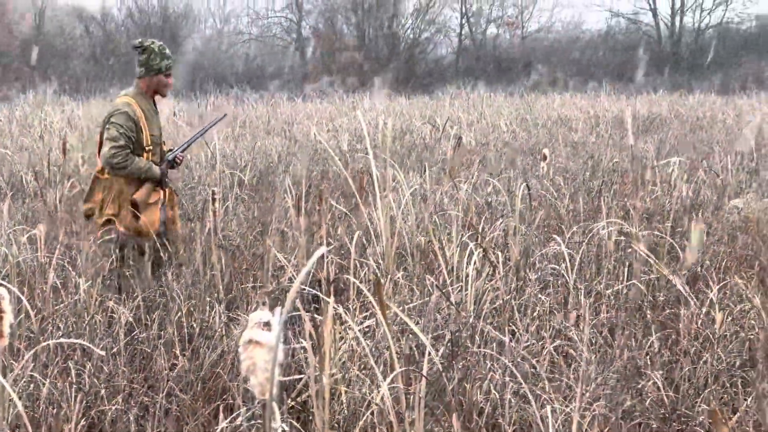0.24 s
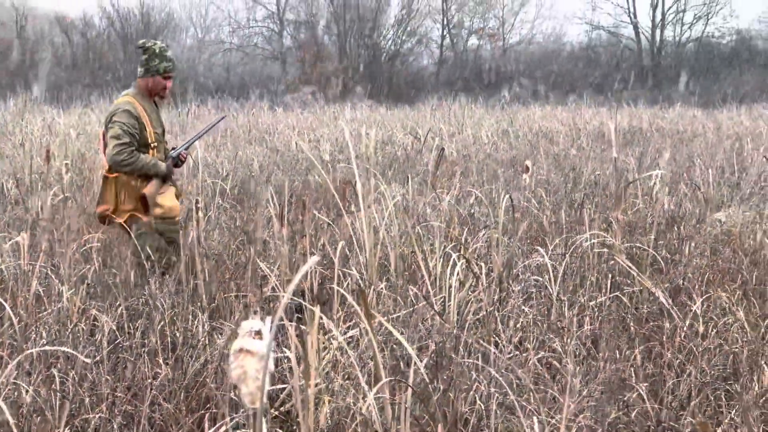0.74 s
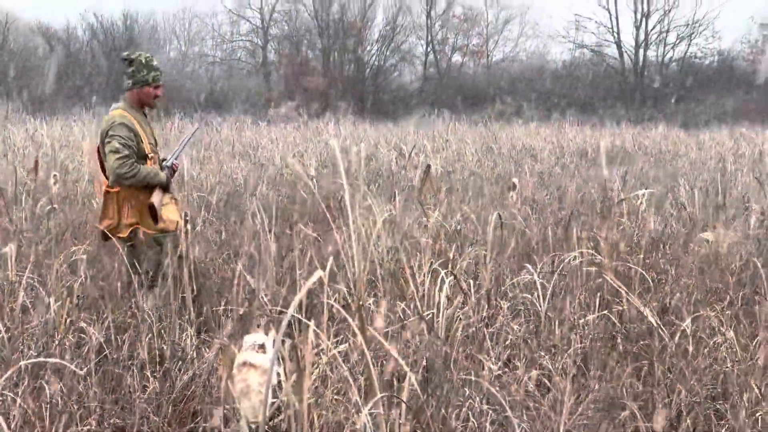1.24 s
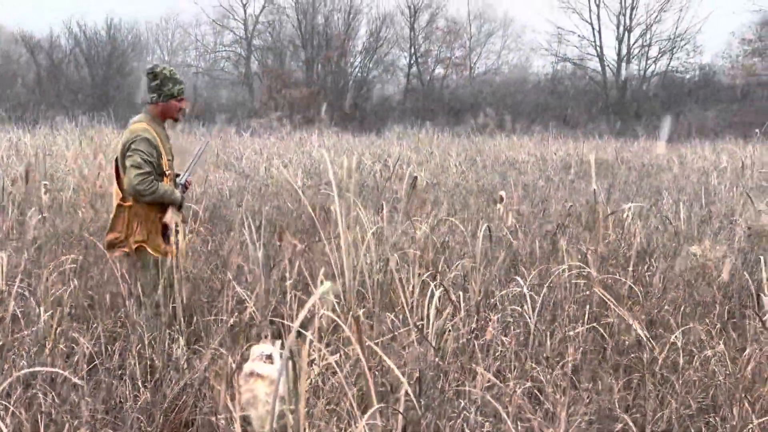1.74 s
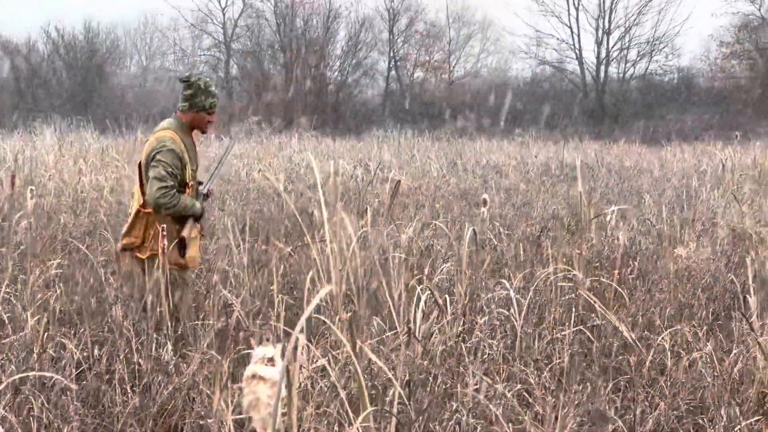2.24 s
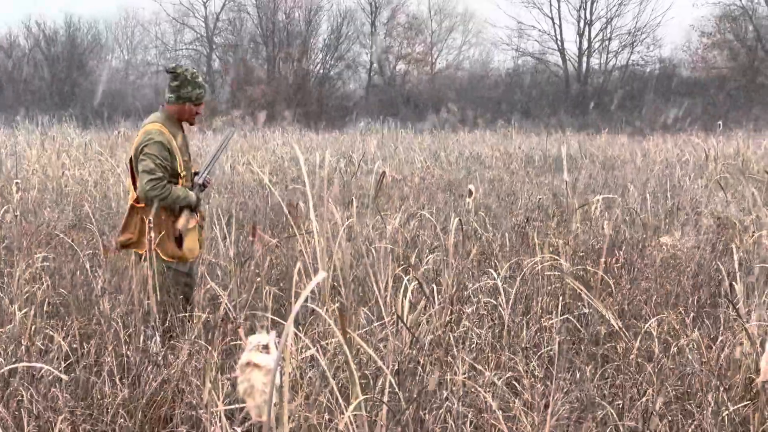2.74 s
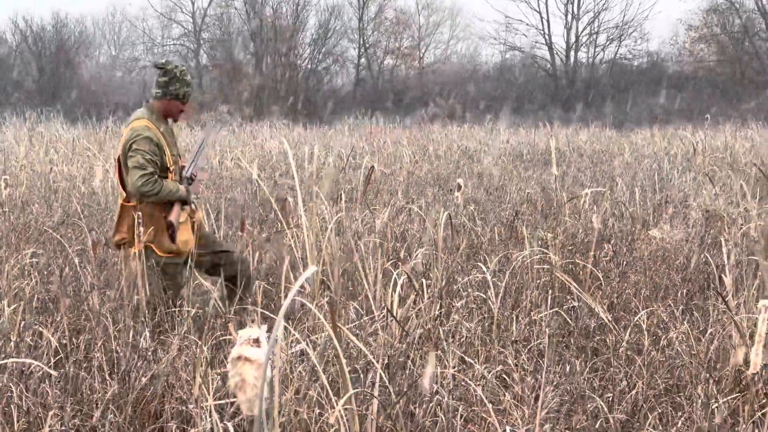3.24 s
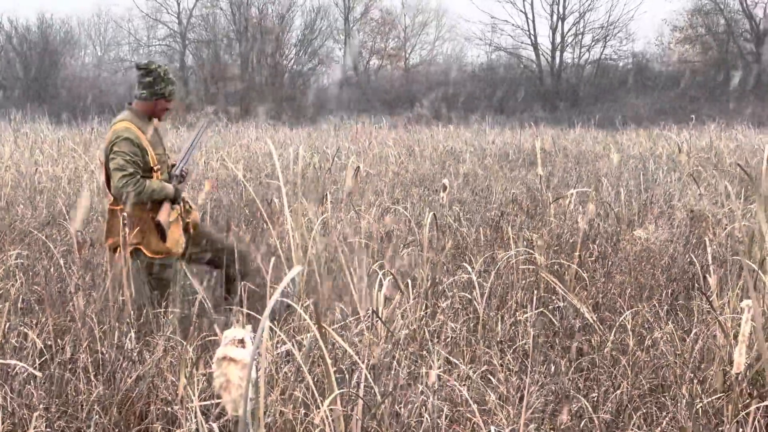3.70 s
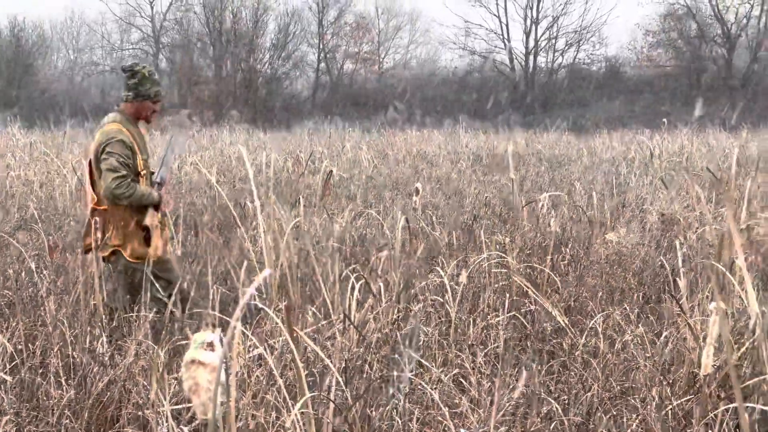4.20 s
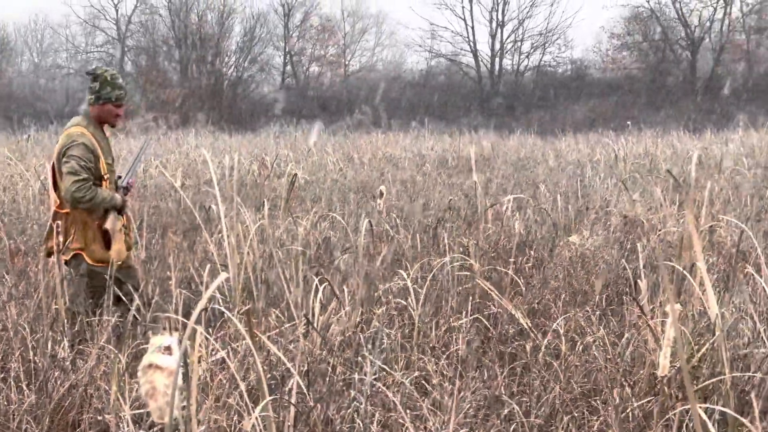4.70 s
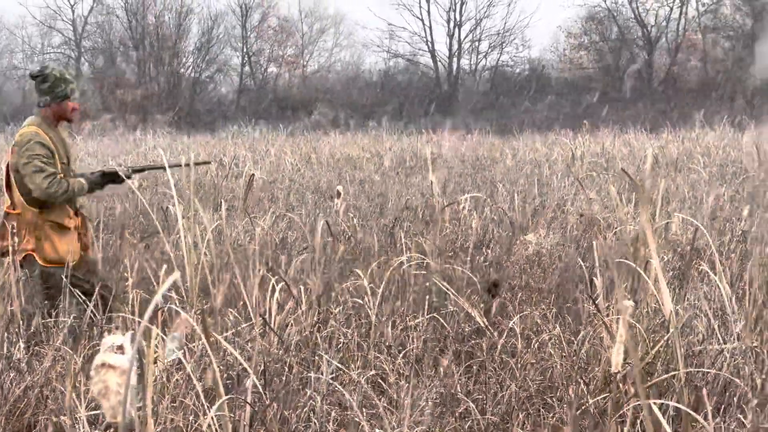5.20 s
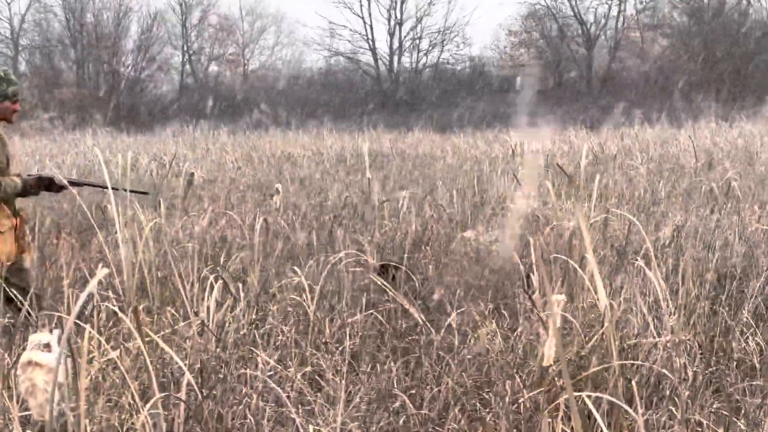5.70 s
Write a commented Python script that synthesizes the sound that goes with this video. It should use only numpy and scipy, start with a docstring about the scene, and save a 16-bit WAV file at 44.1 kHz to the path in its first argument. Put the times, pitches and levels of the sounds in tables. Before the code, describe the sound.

Outdoors in an open field, someone pushes through tall dry reeds, picked up close in wide stereo. From the start there is a thin, papery rustle with a few crisp snaps, swelling around 0.4 seconds. From 0.6 seconds soft, dull thuds of boots, legs and thick stems join beneath. Sharp stalk snaps bunch around 1.2 seconds, and a fuller, bright crackling sweep peaks near 2 seconds with rapid snapping. Further brushing and cracks follow from 3 seconds, with another strong rustle around 3.8 to 4.3. Then it thins to light rustling, with small knocks at 4.6 to 4.8 seconds. Leaves stir again around 5 seconds with lighter snaps. At about 5.6 a bent stem gives a short, slowing creak, followed by lower, woody cracks, swishing stalks and a cluster of dull thumps. Low wind rumble wavers quietly throughout and is strongest at the end, near 6 seconds.

```python
"""Someone wades through tall dry reeds in an open field, heard close by in stereo for some six seconds.
From the start leaves and stalks rub in swells of fine crackle (noise gated by chance fractures), stalks
snap (noise bursts into a resonance) and wind rumbles low (filtered noise). From 0.6 s boots, legs and
thick stems thud dully (decaying swings of sinking pitch); at 5.6 s a bent stem creaks (slowing clicks into
a resonance), and near the end the rumble is strongest."""
import sys
import numpy as np
from scipy import signal
from scipy.fft import rfft, irfft, next_fast_len
from scipy.io import wavfile

SR = 44100
rng = np.random.default_rng(int(sys.argv[2]) if len(sys.argv) > 2 else 0)


def to_wav(s):
    """Save 16-bit WAV."""
    ch = np.atleast_2d(s).T  # columns
    pcm = np.round(np.clip(ch, -1, 1) * 32767)  # PCM
    wavfile.write(sys.argv[1], SR, pcm.astype(np.int16))


N = 262395

# Sweeps of legs and arms through the stand:
# (time of full strength [s], time to swell by SWELL_DB [s], hold [s], leaf rustle level [dB],
#  blade rub against leaves [dB], stalk swish against leaves [dB])
LEG_AND_ARM_SWEEPS = [(0, .1, 0.0085, -59, -15, -4), (0.228, 0.027, .2, -53.5, -5, -11.5),
                      (0.365, .18, 0, -42, -8, -13.5), (0.488, 0.15, 0.078, -51.5, -4.5, -5.5),
                      (0.819, 0.18, 0.089, -51, -3.5, -3.5), (1.163, 0.14, 0.11, -49, -6, -8.5),
                      (1.442, 0.37, 0.049, -55, -7, -7), (1.797, 0.26, 0.051, -44, -9.5, -11.5),
                      (1.943, 0.17, 0, -40.5, -8, -7.5), (2.108, 0.084, 0.0082, -42, -6.5, -6),
                      (2.215, .083, 0.11, -49, -9, -13), (2.685, 0.28, 0.2, -48, -9, -7.5),
                      (3.089, 0.071, 0.076, -49.5, -10, -11.5), (3.203, 0.063, 0.074, -45.5, -10.5, -8),
                      (3.366, .23, 0.058, -48, -9, -7.5), (3.531, 0.13, 0.025, -47.5, -3.5, -6),
                      (3.824, 0.19, 0.15, -40, -8.5, -9), (4.183, .069, 0.15, -52.5, -6, -12.5),
                      (4.466, 0.14, 0.037, -55.5, -5, -7), (4.698, 0.54, 0.37, -51, -3.5, -4),
                      (5.007, 0.21, 0.4, -46.5, -9.5, -8.5), (5.62, .12, 0.025, -53.5, -3.5, -5.5),
                      (5.723, 0.088, 0, -49, -3, 2.5), (5.828, 0.044, 0, -49, -3, 4.5),
                      (5.926, 0.039, 0, -62.5, -6, 16)]
# Stirring between sweeps: (leaf level [dB], blade level [dB], stalk level [dB])
STIRRING_DB = (-82, -73, -76.5)
SWELL_DB, FADE_DB_PER_S = 20, 90

# Relative spectra of leaf crackle, blade rub and stalk swish: (frequency [Hz], density [dB per Hz])
LEAF_SPECTRUM = [(2500, -25), (4000, -8), (5600, -1), (8300, 1.75), (9500, -1.5), (11300, 1.84),
                 (13300, -5.5), (15700, -1.5), (16000, -49), (17000, -43)]
BLADE_SPECTRUM = [(1200, -23), (1750, -3), (2300, 0.5), (3000, -4), (3800, -3), (6000, -20.5)]
STALK_SPECTRUM = [(90, -9), (200, -2.5), (600, -3), (1000, -2), (1350, -4.5), (1700, -4.5), (2500, -19.5)]

# Snapping stalks: (onset time [s], peak level of the body [dB], resonance frequency [Hz],
#  treble peak against the body peak [dB])
STALK_SNAPS = [(.0025, -26.5, 6300, -20), (0.0285, -36.5, 8300, 14), (.072, -37.5, 7740, 12.5),
               (0.2142, -23.5, 6200, 1), (.488, -31, 4000, -7), (0.5119, -22.5, 7850, -7),
               (.517, -30, 7000, -3), (.534, -29.5, 2220, 14.5), (0.565, -34, 2180, -10),
               (0.8737, -18, 6760, 1), (0.9002, -27.5, 8040, -16.5), (0.9804, -30, 4260, 9),
               (1.069, -34, 7190, 4), (1.1205, -24.5, 2340, -29), (1.1697, -25.5, 8100, -5),
               (1.192, -29, 6700, -10), (1.223, -23, 5950, 7.5), (1.239, -20.5, 7350, -23),
               (1.245, -26, 8000, 2), (1.267, -28, 2650, 7), (1.282, -16, 7200, 8),
               (1.2881, -22, 2460, -19), (1.5304, -30, 2100, -46), (1.8812, -26, 8100, 13.5),
               (1.924, -25.5, 8920, 8.5), (1.939, -23.5, 6970, 5), (1.9696, -16.5, 7860, 0),
               (2.0688, -20.5, 6500, -2), (2.086, -29, 7000, 0), (2.1082, -22, 6600, -2),
               (2.1224, -17, 6600, -.5), (2.14, -18.5, 8700, 0), (2.1984, -24, 7200, .5),
               (2.2568, -20.5, 2180, -25), (2.3284, -31, 7050, 6.5), (2.3528, -26, 7400, -27),
               (2.4634, -29.5, 5740, 4), (2.4967, -24, 9000, 4.5), (2.7522, -34.5, 8600, 16),
               (2.8313, -35, 8900, 13), (2.9297, -27, 7640, 5), (2.9966, -26, 2010, -21),
               (3.182, -26, 7060, 0), (3.2025, -17, 8160, 10.5), (3.213, -25.5, 7000, -3),
               (3.246, -26.5, 4000, -14), (3.2964, -33, 6300, 10), (3.3624, -27, 2550, -23),
               (3.4032, -15.5, 6950, 5.5), (3.53, -28.5, 3460, -5), (3.848, -27, 8300, -9),
               (3.8614, -19.5, 8400, -9), (3.9084, -25.5, 8160, 12), (3.934, -33, 8260, -7),
               (3.9512, -24, 3970, 1), (3.982, -15.5, 8550, -26), (4.013, -24, 7200, 7.5),
               (4.1703, -18.5, 8600, -25), (4.1909, -22.5, 7800, 5), (4.2501, -22, 8100, 14),
               (4.2693, -23.5, 7100, -21), (4.862, -40, 8000, 9), (5.011, -32, 2560, -7),
               (5.051, -41, 3500, -8), (5.096, -24, 8100, -4.5), (5.125, -27, 7000, -3),
               (5.217, -25, 1460, -9), (5.239, -33, 5000, -5), (5.2958, -24, 7460, -12.5),
               (5.32, -31, 6000, -7), (5.3914, -30, 6200, -8), (5.732, -23.5, 1140, 1),
               (5.739, -26, 3760, -2), (5.776, -26.5, 1260, 5.5), (5.8214, -30.5, 1150, -7.5),
               (5.8912, -27, 1540, -3)]
SNAP_WIDTH_DB = 3  # raises row 1 of the snaps, which widens them in stereo

# Dull knocks of boots, legs and thick stems:
# (onset time [s], peak level [dB], starting pitch [Hz], final pitch [Hz])
DULL_THUDS = [(0.644, -45.5, 106, 54.7), (.826, -38.5, 426, 192), (.846, -41, 298, 111),
              (.922, -38, 254, 110), (1.12, -35.5, 654, 129), (2.139, -34, 724, 583),
              (2.996, -35.5, 940, 249), (3.254, -38.5, 1070, 990), (3.364, -41.5, 605, 170),
              (3.555, -46, 1010, 865), (3.626, -37, 1110, 940), (4.61, -39.5, 1740, 1690),
              (4.697, -41, 1680, 1700), (4.768, -38.5, 1690, 1670), (4.813, -37.5, 345, 101),
              (4.663, -45, 170, 100), (4.825, -36, 157, 90), (4.835, -42, 630, 487), (5.752, -39, 150, 100),
              (5.793, -35.5, 540, 400), (5.822, -37, 297, 151), (5.838, -34.5, 150, 108),
              (5.871, -34, 1530, 1420), (5.875, -33, 506, 200), (5.899, -42, 160, 80), (5.93, -34, 110, 80),
              (5.941, -36, 730, 444)]

# A bent stem creaking, ever slower: (start time [s], end time [s], first gap [s], growth of each gap [ratio],
#  resonance frequency [Hz], bandwidth [Hz], click level before the resonances [dB])
STEM_CREAK = [(5.585, 5.705, .005, 1.04, 655, 580, -17.5)]

# Level of the wind rumble, before its random lumps: (time [s], level [dB])
RUMBLE_LEVEL = [(0, -58), (.33, -60.5), (.76, -61.5), (.89, -57.5), (1.01, -60.5), (1.62, -60),
                (2.0, -57.5), (2.43, -63.5), (3.03, -61), (3.38, -59), (3.63, -57.5), (3.9, -54.5),
                (4.29, -66.5), (4.81, -54), (5.3, -57.5), (5.5, -65), (5.8, -50), (5.95, -47)]
# Relative spectrum of the wind: (frequency [Hz], density [dB per Hz])
WIND_SPECTRUM = [(12, -37), (20, -66), (49, 4), (75, 2.5), (173, -7), (400, -17), (520, -14), (880, -120)]

# Left channel against right, before the treble alternation below:
# (frequency [Hz], phase by which left leads [rad], left louder by [dB], likeness [0-1])
CHANNEL_DIFFERENCES = [(60, .05, 1.8, .985), (300, .12, 2.8, .96), (700, .8, 3.5, .88),
                       (1000, .95, 2.1, .78), (1450, 1.4, 4.5, .4), (1700, -.4, 3.5, .6),
                       (2300, .05, 0, .99), (3200, .25, 0, .93), (4000, .03, 0, .995)]
# Above this frequency the left and right channels alternate between in phase and opposite phase
ALTERNATE_FROM_HZ, ALTERNATE_EVERY_HZ = 8400, 1800
ALTERNATE_DWELL = 0.9  # 0: phase turns evenly over frequency; towards 1: lingers at either phase
ALTERNATE_UNLIKE = 0.29  # likeness lost half way from one phase to the other
CUTOFF_HZ = 16900


def from_db(db):
    """Logarithmic level: dB to amplitude ratio."""
    return 10 ** (np.asarray(db) / 20)


def rms_one(x):
    """Power normalisation: scales to rms 1."""
    return x / np.sqrt(np.mean(x ** 2) + 1e-20)


def in_time(rows):
    """Linear interpolation: joins table rows by straight lines over time."""
    times, *columns = np.transpose(rows)
    return [np.interp(np.arange(N) / SR, times, column) for column in columns]


def coloured(x, spectrum):
    """Linear filtering by a (Hz, dB) spectrum; white noise of rms 1 comes out at about rms 1."""
    size = next_fast_len(x.shape[-1])
    hz, db = np.transpose(spectrum)
    bins = np.arange(size // 2 + 1) * SR / size
    gain = from_db(np.interp(np.log(bins + 1), np.log(hz), db, left=-80))
    return irfft(rfft(x, size) * rms_one(gain), size)[..., :x.shape[-1]]


def drift(rate_hz):
    """Low-passed random process: slow chance of spread about 1, with two poles at rate_hz."""
    step = 40  # samples between drawn points
    r = np.exp(-2 * np.pi * rate_hz * step / SR)
    draws = rng.standard_normal(N // step + 2002)
    slow = signal.lfilter([1], [1, -2 * r, r * r], draws)[2000:]  # start-up dropped
    return np.interp(np.arange(N) / step, np.arange(len(slow)), rms_one(slow))


def dying(x, t60):
    """Exponential decay: every click becomes a step that falls 60 dB in t60 seconds."""
    return signal.lfilter([1], [1, -from_db(-60 / (t60 * SR))], x + 1e-18)


def ring(x, hz, width_hz):
    """Damped resonance: one two-pole band-pass, gain about 1 at its peak."""
    r = np.exp(-np.pi * width_hz / SR)
    feedback = [1, -2 * r * np.cos(2 * np.pi * hz / SR), r * r]
    return signal.lfilter([(1 - r * r) / 2, 0, (r * r - 1) / 2], feedback, x)


def crackle(per_s, spread_db, t60, smooth, clump_db):
    """Clustered shot noise: clumps of tiny fractures over a smooth rub, shared in time, unrelated in noise."""
    chance = rng.random(N)
    size = np.minimum(rng.exponential(1, N), 4)
    born = chance < per_s * from_db(clump_db * drift(15.0)) / SR
    puffs = rms_one(dying(born * from_db(spread_db * size), t60))
    return rms_one((smooth + puffs) * rng.standard_normal((2, N)))


def rustle():
    """Frictional noise: leaves crackle finely, blades rub lower, stalks swish lower still, tips tick sharply."""
    leaf_gain, blade_gain, stalk_gain = sweeps()
    leaves = crackle(per_s=470.0, spread_db=5.5, t60=0.011, smooth=1.63, clump_db=6.0)
    blades = 0.49 * leaves + crackle(per_s=82.0, spread_db=1.5, t60=0.019, smooth=1.8, clump_db=7.0)
    stalks = 0.45 * leaves + crackle(per_s=84.0, spread_db=6.5, t60=0.021, smooth=1.24, clump_db=2.0)
    ticks = crackle(per_s=60.0, spread_db=4.0, t60=0.0042, smooth=0, clump_db=5.0)
    leaves = leaves + 0.18 * ticks
    blades = blades + 0.29 * ticks
    return (leaf_gain * coloured(leaves, LEAF_SPECTRUM)
            + blade_gain * coloured(rms_one(blades), BLADE_SPECTRUM)
            + stalk_gain * coloured(rms_one(stalks), STALK_SPECTRUM))


def sweeps():
    """Addition of powers: each sweep swells, holds and fades; gives gains of leaves, blades and stalks."""
    t = np.arange(0, N, 64) / SR
    power = from_db(STIRRING_DB)[:, None] ** 2
    for full_at, swell, hold, db, blade_db, stalk_db in LEG_AND_ARM_SWEEPS:
        before_db = SWELL_DB * (full_at - t) / swell
        after_db = FADE_DB_PER_S * (t - full_at - hold)
        short_db = np.maximum(before_db, after_db).clip(0)  # how far below full strength
        layer_db = np.array([[0], [blade_db], [stalk_db]])
        power = power + from_db(db + layer_db - short_db) ** 2
    return [np.interp(np.arange(N) / SR, t, np.sqrt(p)) for p in power]


def snaps():
    """Brittle fracture: a stalk splits within a millisecond, rings at its own pitch and splinters on."""
    t = np.arange(round(0.04 * SR)) / SR
    split_decay = np.exp(-t / 0.00031)
    splinter_decay = 0.026 * np.exp(-t / 0.0042)
    crack = (1 - np.exp(-t / 0.00045)) ** 2 * (split_decay + splinter_decay)
    knock = (1 - np.exp(-t / 0.00019)) * np.exp(-t / 0.0017)
    noise = rng.standard_normal((len(STALK_SNAPS), 2, 2, len(t)))
    body_band = signal.butter(2, [1900, 9200], "band", fs=SR, output="sos")
    treble_band = signal.butter(2, 9500, "high", fs=SR, output="sos")
    bright, dull = np.zeros((2, 2, N + len(t)))
    for (onset, db, hz, treble_db), (hiss, rub) in zip(STALK_SNAPS, noise):
        split = crack * hiss
        body = signal.sosfilt(body_band, split) + 3.5 * ring(split, hz, 0.24 * hz)
        body = body / np.abs(body).max(axis=1, keepdims=True)
        notched = split - ring(split, 14100, 3600.0)  # dip around 14.1 kHz
        treble = signal.sosfilt(treble_band, notched)
        treble = treble / np.abs(treble).max(axis=1, keepdims=True)
        start = round(onset * SR)
        at = slice(start, start + len(t))
        bright[:, at] += from_db(db) * (body + from_db(treble_db) * treble)
        dull[:, at] += from_db(db - 22.5) * knock * rub
    bright[1] *= from_db(SNAP_WIDTH_DB)
    top_cut = signal.butter(8, 16200, fs=SR, output="sos")
    return (signal.sosfilt(top_cut, bright) + coloured(dull, STALK_SPECTRUM))[:, :N]


def thuds():
    """Damped oscillation: a soft push swings briefly, its pitch sinking, with crushed litter in it."""
    t = np.arange(round(0.12 * SR)) / SR
    out = np.zeros((2, N + len(t)))
    noise = rng.standard_normal((len(DULL_THUDS), 2, len(t)))
    for (onset, db, start_hz, end_hz), litter in zip(DULL_THUDS, noise):
        middle_hz = np.sqrt(start_hz * end_hz)
        last = 0.9 * (middle_hz / 100) ** 0.48 / middle_hz  # decay time constant, s
        hz = end_hz + (start_hz - end_hz) * np.exp(-t / (1.11 * last))
        swing = np.sin(2 * np.pi * np.cumsum(hz) / SR)
        crush = 0.51 * rms_one(ring(litter, 0.67 * start_hz, 0.48 * start_hz))
        envelope = (1 - np.exp(-t / (0.32 * last))) * np.exp(-t / last)
        thud = envelope * (swing + crush)
        start = round(onset * SR)
        out[:, start:start + len(t)] += from_db(db) * thud / np.abs(thud).max()
    return out[:, :N]


def creak():
    """Stick-slip friction: clicks at growing, uneven gaps excite the stem's broad resonance."""
    start, end, first_gap, growth, hz, width_hz, db = STEM_CREAK[0]
    gap_db, size = rng.standard_normal((2, 30))
    gaps = first_gap * growth ** np.arange(30) * from_db(gap_db)
    slips = start + np.cumsum(gaps)
    clicks = np.zeros(N + SR)
    clicks[(slips * SR).astype(int)] = from_db(db + 2 * size) * (slips < end)
    return ring(ring(clicks[:N] + 1e-18, hz, width_hz), hz, 2 * width_hz)


def rumble():
    """Random amplitude modulation: the wind is low noise whose level wanders in lumps."""
    db, = in_time(RUMBLE_LEVEL)
    lumps_db = 1.84 * drift(5.8)
    return from_db(db + lumps_db) * coloured(rng.standard_normal((2, N)), WIND_SPECTRUM)


def scene():
    """Superposition: row 0 is the sound both channels share, row 1 like sound for the right channel alone."""
    return rustle() + snaps() + thuds() + creak() + rumble()


def record(dry):
    """Partial coherence: the right channel mixes phase-turned shared sound with its own; the top is cut."""
    size = next_fast_len(N + 4096)
    bins = np.arange(size // 2 + 1) * SR / size
    hz, *columns = np.transpose(CHANNEL_DIFFERENCES)
    lead, louder_db, alike = (np.interp(bins, hz, column) for column in columns)
    turn = np.pi * np.maximum(bins - ALTERNATE_FROM_HZ, 0) / ALTERNATE_EVERY_HZ
    lead = lead - turn + ALTERNATE_DWELL / 2 * np.sin(2 * turn)
    alike = np.clip(alike - ALTERNATE_UNLIKE * np.sin(turn) ** 2, 0, 1)
    shared, own = rfft(dry, size)
    left = shared * from_db(louder_db / 2)
    right = alike * shared * np.exp(-1j * lead) + np.sqrt(1 - alike ** 2) * own
    right = right * from_db(-louder_db / 2)
    channels = irfft([left, right], size)[:, :N]
    top_cut = signal.cheby2(12, 60, CUTOFF_HZ, fs=SR, output="sos")
    return signal.sosfilt(top_cut, channels)


dry = scene()
out = record(dry)
to_wav(out)
```